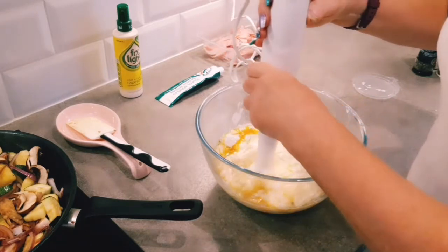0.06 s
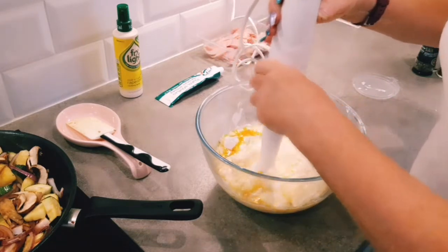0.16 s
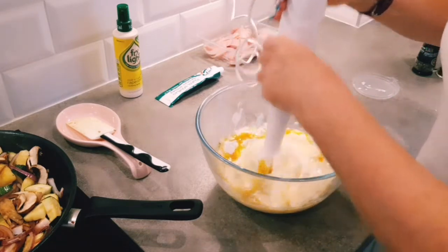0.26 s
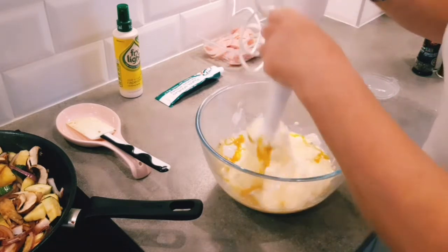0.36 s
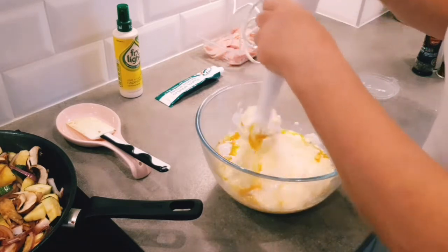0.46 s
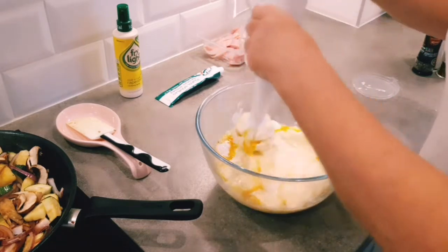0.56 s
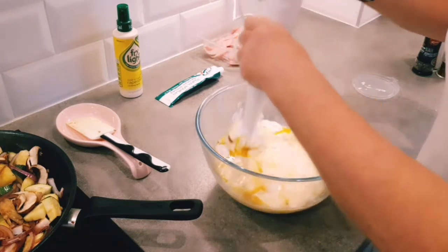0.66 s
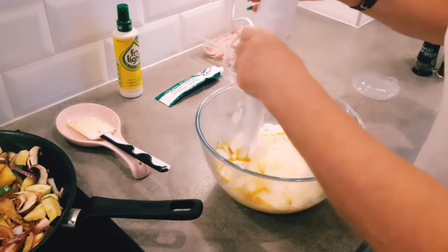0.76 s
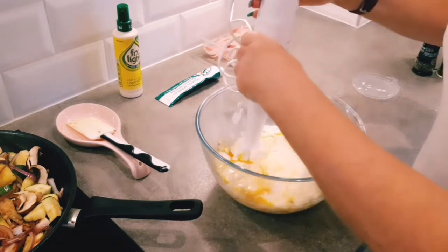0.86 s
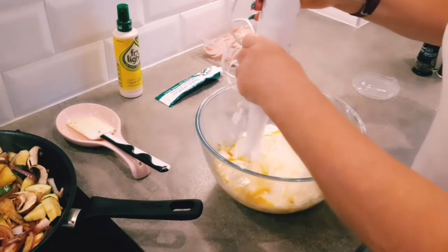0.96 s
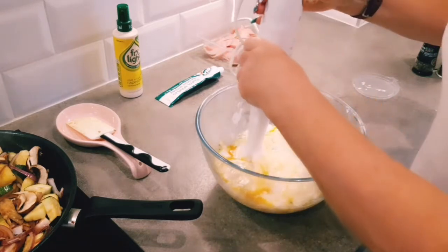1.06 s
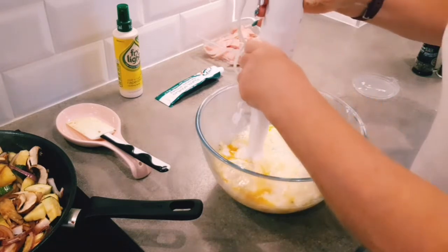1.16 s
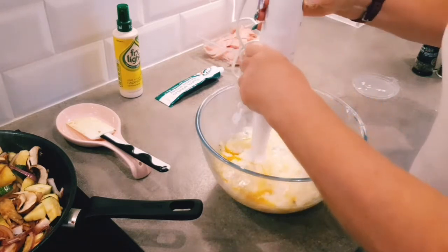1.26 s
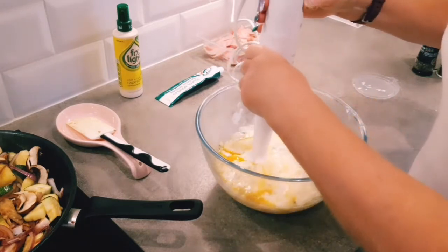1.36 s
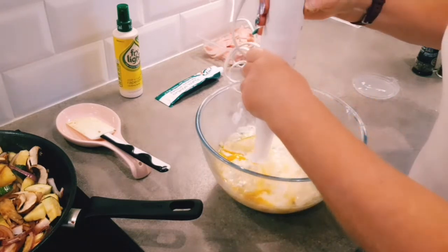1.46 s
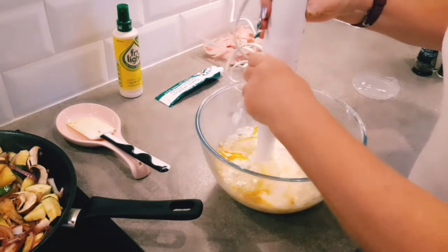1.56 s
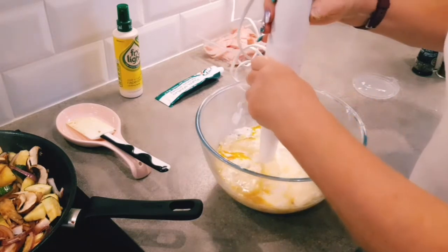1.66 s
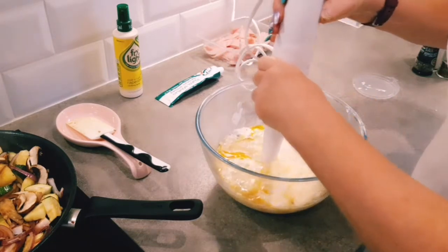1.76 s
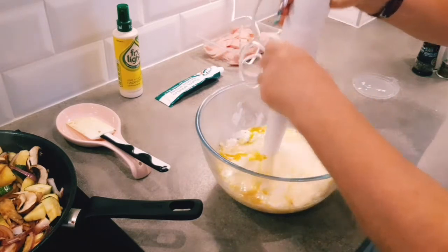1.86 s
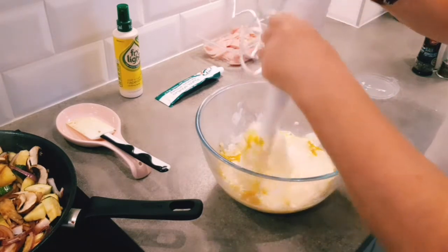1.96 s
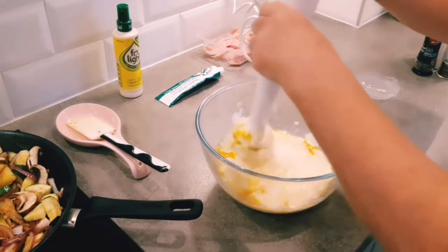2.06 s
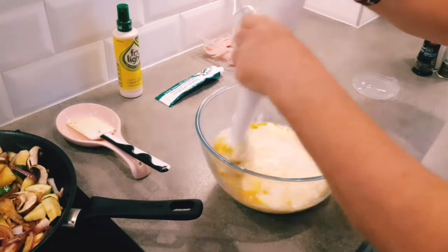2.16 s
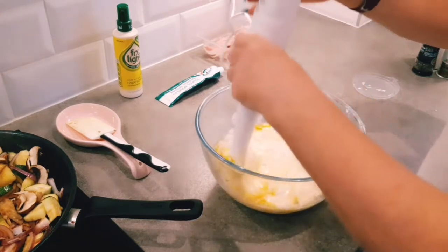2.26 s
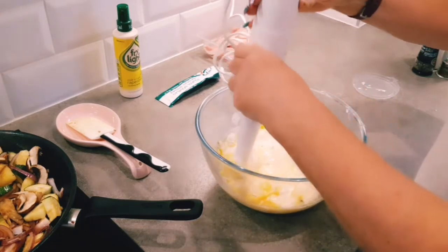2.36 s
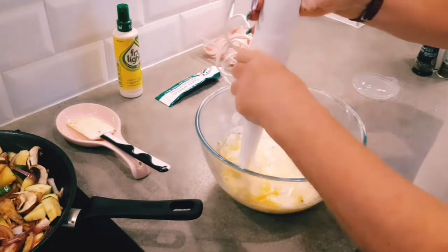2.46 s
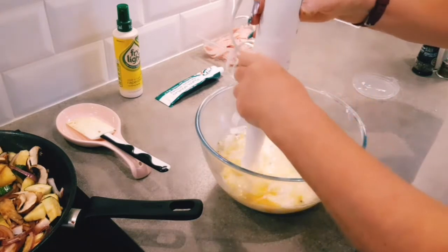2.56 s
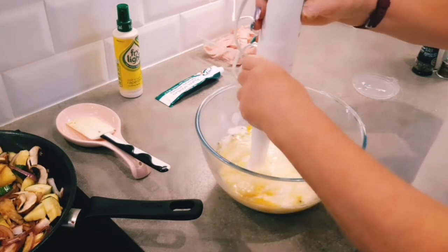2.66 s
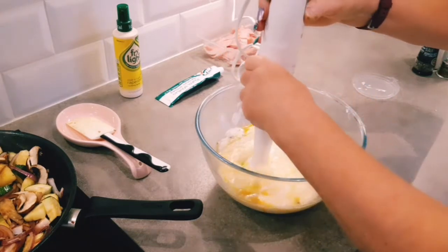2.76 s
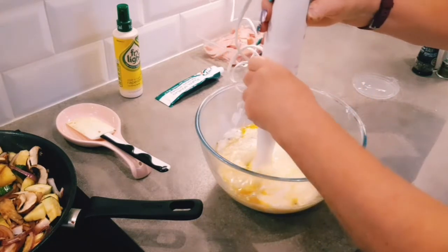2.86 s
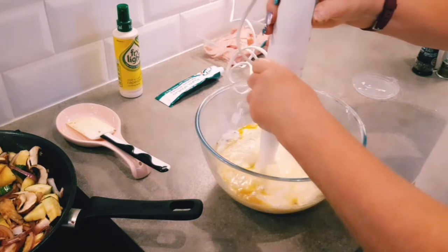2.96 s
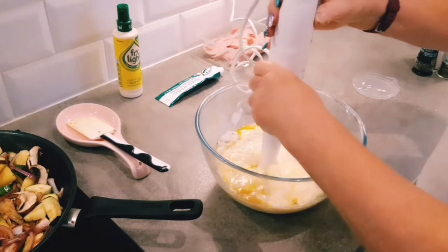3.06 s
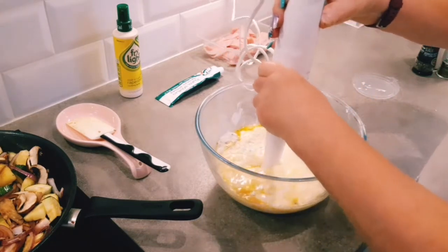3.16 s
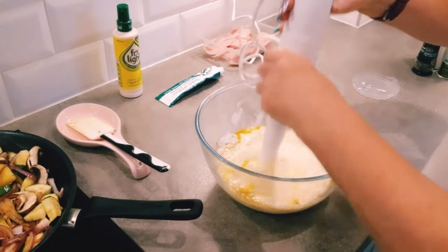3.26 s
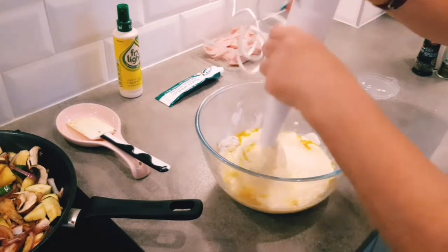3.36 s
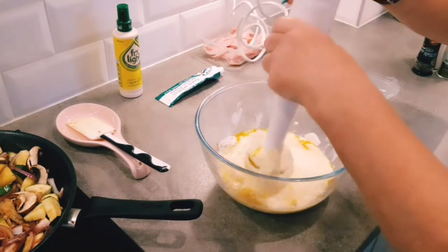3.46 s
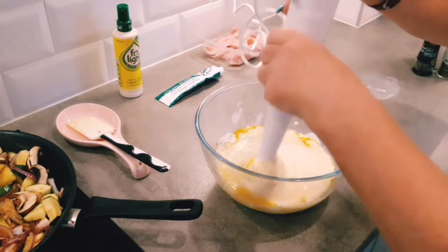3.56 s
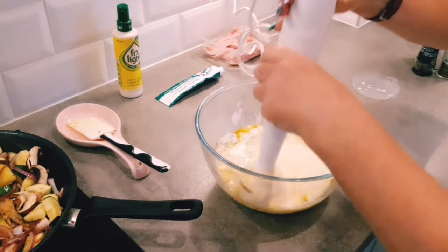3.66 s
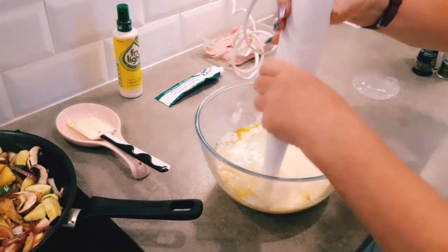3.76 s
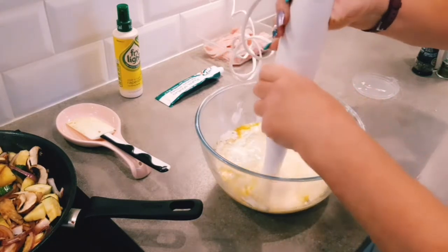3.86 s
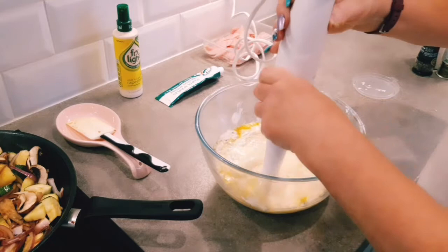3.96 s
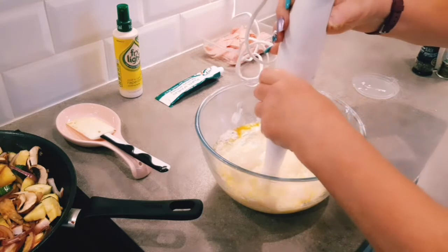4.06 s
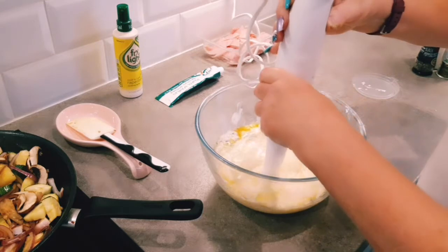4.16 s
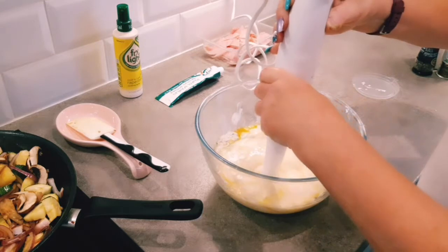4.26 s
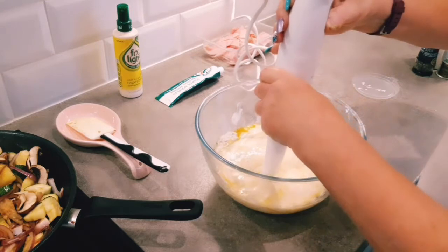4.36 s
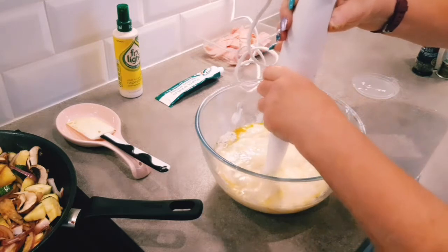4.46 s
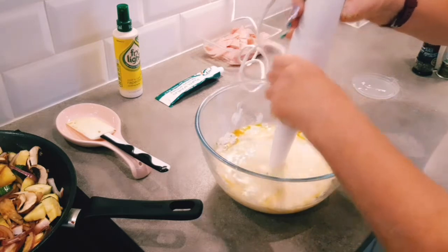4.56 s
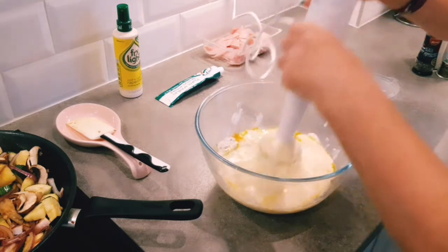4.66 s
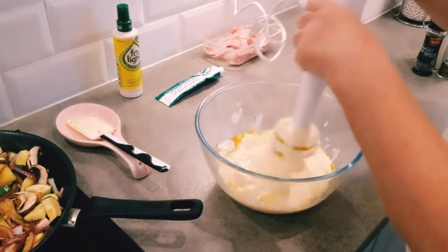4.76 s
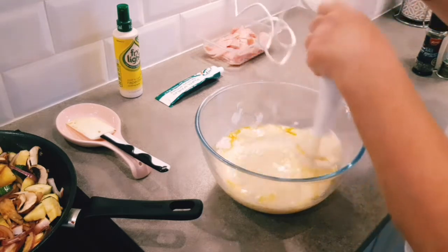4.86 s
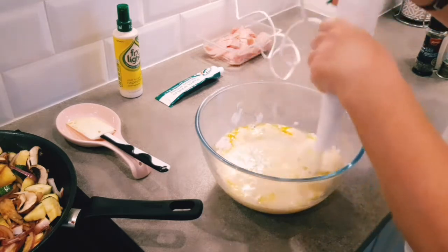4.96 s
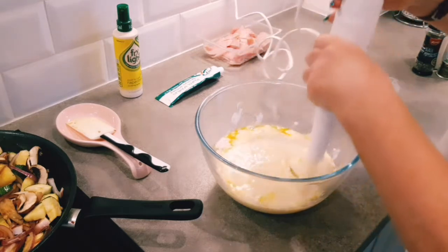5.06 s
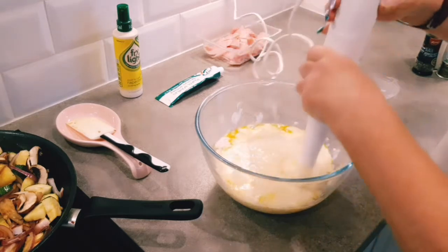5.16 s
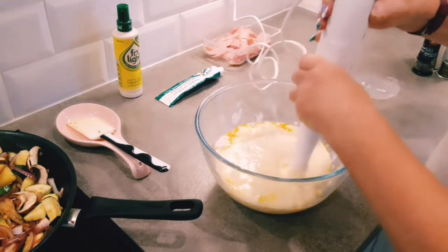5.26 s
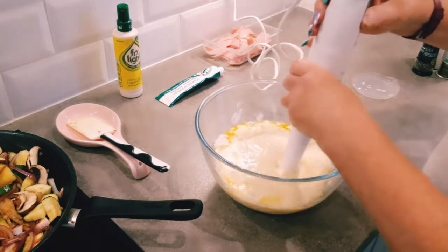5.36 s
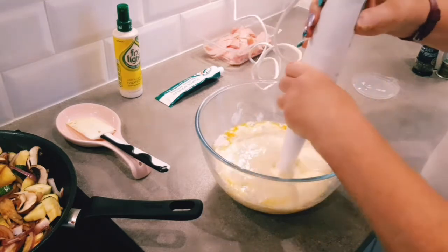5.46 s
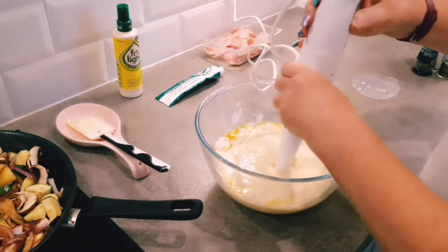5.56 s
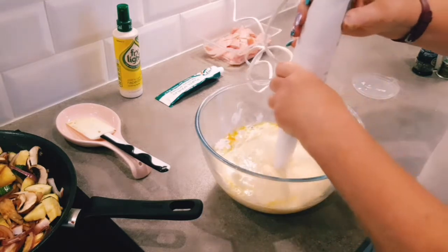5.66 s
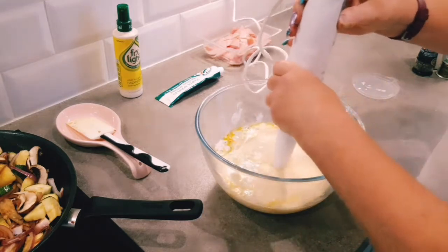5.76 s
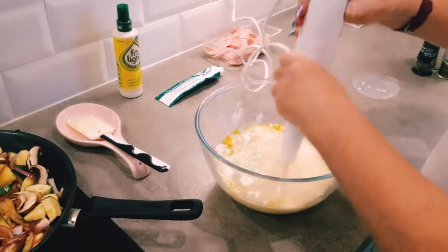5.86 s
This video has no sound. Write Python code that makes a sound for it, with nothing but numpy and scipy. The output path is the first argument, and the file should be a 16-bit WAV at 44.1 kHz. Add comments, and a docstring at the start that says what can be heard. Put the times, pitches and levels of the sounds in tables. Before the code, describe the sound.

Close up in a tiled home kitchen, a stick blender pulses five times in a glass bowl of egg and cream. The first burst is already running and soon stops; four more follow about every 1.4 seconds, each a rattling motor whirr with wet churning. Between them the foot scuffs and clinks on the glass with a dull worktop thump. A pan hisses very faintly. Stereo microphone nearby, lively short room echo.

```python
"""Stick blender in a glass bowl

A stick blender is pulsed five times in a glass bowl of egg and cream, in a tiled kitchen; a pan hisses nearby.
Filtered random impacts make the rattle of the shaft, filtered noise the churning liquid, and shaken sines the hum.
After each release the tones die first, and the noise fades as friction stops the shaft.
Between bursts the foot lands on the glass: scuffs of noise, and clicks that set decaying modes ringing."""
import sys
import numpy as np
from scipy import signal
from scipy.fft import rfft, irfft, next_fast_len
from scipy.io import wavfile

SR = 44100
rng = np.random.default_rng(int(sys.argv[2]) if len(sys.argv) > 2 else 0)


def wrap_up_sound(samples):
    """Save the sound to the file named by the first command line argument, as 16-bit audio."""
    columns = np.atleast_2d(samples).T
    # keep every value between -1 and 1, then stretch to whole-number steps
    tamed = np.clip(columns, -1, 1)
    steps = np.round(tamed * 32767).astype(np.int16)
    wavfile.write(sys.argv[1], SR, steps)


N = 260190
TIME = np.arange(N) / SR

# resonances of housing and bowl: (centre [Hz], width [Hz], lift [dB])
HOUSING_MODES = [(295, 33, -3.5), (388.7, 45, 7), (600, 30, 3), (735, 57, 4.5), (969, 56, 4),
                 (1226, 130, 3), (1780, 200, 4), (2787, 74, 5.5)]


def current_press():
    """Piecewise-constant control: the columns of the latest press of the button at every moment."""
    # presses of the button, the first begun before time zero; levels are relative:
    # (on [s], off [s], coasting time [s], free speed [turns/s], sag under load [turns/s], pick-up time [s],
    #  time until the blade runs free [s], churning level [dB], churning build-up [s],
    #  final blade tone level [dB], blade tone swell [dB/s], shaft tone level [dB],
    #  swirl level [dB], swirl length [s], push on the worktop [dB])
    presses = np.array([(-0.4, 0.154, 0.15, 308, 47, 0.13, 0.46, -23, 0.036, -31, -5, -27, -31, 0.47, -3.5),
                        (1.128, 1.713, 0.17, 335, 66.3, 0.5, 0.47, -24.5, 0.1, -24, 2.5, -26.5, -24, 0.38, 0.5),
                        (2.549, 3.157, 0.19, 321, 54.2, 0.26, 0.35, -25.5, 0.13, -20, 17.5, -24, -23, 0.12, -3),
                        (3.948, 4.456, 0.2, 306, 24.7, 0.1083, 0.43, -22.3, 0.0082, -28, 9, -28.5, -33, 0.33, -14),
                        (5.276, 5.784, 0.32, 314, 47, 0.3, 0.44, -24.5, 0.041, -20, 25, -30.5, -36, 0.55, 7)])
    latest = np.searchsorted(presses[:, 0], TIME, side="right") - 1
    return presses[np.maximum(latest, 0)].T


def blender(count=3):
    """Superposition: noise radiated independently by several parts (housing, shaft, bowl), and a shared hum."""
    (on, off, _, free_speed, sag, pickup_s, free_s, churn_db, build_s,
     blade_db, swell, shaft_db, swirl_db, swirl_s, push_db) = current_press()
    grinding, brushing, driven = motor()
    age = TIME - on
    # the shaft gathers speed as the mixture gives way
    turns = free_speed - sag * np.exp(-age / pickup_s)
    angle = 2 * np.pi * np.cumsum(turns) / SR
    freeing_s = 0.0062
    free = step(age - free_s, freeing_s)

    # the rattle starts just after the motor, builds up quickly and eases by 1 dB once the blade runs free
    rattle_gain = from_db(-20 - 1 * free) * rise(age - 0.0047, 0.026) * grinding
    # the liquid starts later still; the power below 1 keeps it moving a little longer than the rattle
    churn_gain = from_db(churn_db) * rise(age - 0.023, build_s) * grinding ** 0.56
    brush_gain = from_db(-43.5) * brushing
    parts = []
    for _ in range(count):
        part = rattle_gain * rattle(angle) + churn_gain * churn() + brush_gain * brushes(angle)
        parts.append(part / np.sqrt(count))

    # thick mixture damps the shaft; it shakes briefly when the blade runs free
    shake_s, damping_db = 0.22, 14
    shaking = free * step(free_s + shake_s - age, freeing_s)
    shaft_gain = from_db(shaft_db - 3 - damping_db * (1 - shaking)) * rise(age, build_s)
    # the blade tone emerges once the mixture is moving, then its level slopes until release
    blade_gain = from_db(blade_db - 3.5 - swell * np.maximum(off - TIME, 0)) * step(age - 0.13, 0.023)
    # unbalance sounds once a turn, the two wings twice
    hum = shaft_gain * tone(angle, wobble=0.095, rough_db=2.5)
    hum += blade_gain * tone(2 * angle, wobble=0.25, rough_db=2.5)
    hum += swirl(age, turns, swirl_db, swirl_s) + worktop_hum(age, push_db)
    return parts, driven * hum


def motor(fade_power=4.53, brush_power=1.0, spin_up_s=0.015, unload_s=0.053, start_s=0.0044):
    """Friction and inertia: gains of grinding and brushes follow the coasting shaft, tones die on release."""
    on, off, coast_s = current_press()[:3]
    begun = rise(TIME - on, start_s)
    # relative speed for the levels only; the pitch does not follow it
    speed = np.clip(1 - (TIME - off) / coast_s, 0, 1)
    grinding = begun * speed ** fade_power
    brushing = rise(TIME - on, spin_up_s) * speed ** brush_power
    driven = begun * np.exp(-np.maximum(TIME - off, 0) / unload_s)
    return grinding, brushing, driven


def rattle(angle, impacts_per_s=3000, size_db=2.5, throb=0.38, hiss_db=-4, flutter_db=1.87):
    """Impact excitation: shaft, coupling and blade chatter in tiny impacts, bunched on each turn."""
    # broad colour of the rattle: (frequency [Hz], level [dB])
    rattle_colour = [(30, -48), (250, -22), (500, -7.5), (700, -4), (1250, 2), (1450, 0), (2100, -2.5),
                     (2600, -10.5), (3100, -13), (4300, -16), (6000, -24), (9500, -35.5), (14500, -34),
                     (16000, -38)]
    # the coupling clacks as it takes up its slack: (time [s], size against the running force [dB])
    clacks = [(1.143, 22), (2.567, 16), (3.982, 24), (5.294, 17)]
    sizes = from_db(size_db * np.minimum(rng.exponential(1, N), 5))
    signed_sizes = sizes * rng.choice([-1, 1], N)
    impacts = rms_one(signed_sizes * (rng.random(N) < impacts_per_s / SR))
    hiss = from_db(hiss_db) * rng.standard_normal(N)
    force = (impacts + hiss) * (1 + throb * np.cos(angle))
    force = rms_one(force * from_db(flutter_db * drift(70)))
    for s, db in clacks:
        force[int(s * SR)] += from_db(db)
    return rms_one(colour(force, rattle_colour, HOUSING_MODES))


def churn(slosh_db=-1.0):
    """Turbulence: liquid thrown about by the blade is unsteady noise, coloured by housing and bowl."""
    # colour of the churning liquid: (frequency [Hz], level [dB])
    churn_colour = [(20, -33), (55, -25), (80, -7), (100, -5.5), (160, 3), (195, -8.5), (270, 0),
                    (380, -1.5), (450, -5), (540, 4), (750, -3), (1200, -2.5), (1700, -18.5), (16000, -65)]
    turbulence = rng.standard_normal(N) * from_db(slosh_db * drift(40))
    return rms_one(colour(turbulence, churn_colour, HOUSING_MODES))


def brushes(angle, throb=0.3, sparks_db=1.0):
    """Sliding friction: carbon brushes on the commutator give a thin hiss, pulsing twice a turn."""
    hiss = rng.standard_normal(N) * (1 + throb * np.cos(2 * angle))
    hiss = hiss * from_db(sparks_db * drift(200))
    band = signal.butter(2, [8000, 15000], "band", fs=SR, output="sos")
    return rms_one(signal.sosfilt(band, hiss))


def swirl(age, turns, level_db, length_s):
    """Rotating flow: the mixture drones early in each burst, circling at just under half the shaft speed."""
    share, lag, pickup_s = 0.487, 0.0694, 0.1403  # slower at first by the lag
    swirl_hz = share * turns * (1 - lag * np.exp(-age / pickup_s))
    gain = from_db(level_db - 2) * rise(age, 0.034) ** 2 * step(length_s - age, 0.039)
    return gain * tone(2 * np.pi * np.cumsum(swirl_hz) / SR, wobble=0.3, rough_db=2.0)


def worktop_hum(age, push_db, mains_hz=100, hum_db=-39, rumble_db=-44):
    """Structure-borne sound: pressing the foot down passes mains hum and rumble into the worktop."""
    # colour of the rumble: (frequency [Hz], level [dB])
    rumble_colour = [(15, -18), (35, -20), (60, -9), (85, -6), (110, -1.5), (170, 3), (300, -31),
                     (2000, -58)]
    # the hand bears down gradually
    mains = rise(age, 0.17) * tone(2 * np.pi * mains_hz * TIME, wobble=0.18, rough_db=2.0)
    rumble = rms_one(colour(rng.standard_normal(N), rumble_colour))
    return from_db(push_db) * (from_db(hum_db) * mains + from_db(rumble_db) * rumble)


def tone(angle, wobble, rough_db):
    """Phase and amplitude modulation: a sine shaken by an uneven load."""
    sine = np.sqrt(2) * np.sin(angle + wobble * drift(60))
    return sine * from_db(rough_db * drift(45))


def knocks(tick_db=-13, contact_s=0.0045, settle_s=0.0012, soft_hz=900):
    """Modal excitation: the foot scuffs the glass, which rings; then its weight thumps the worktop."""
    # landings of the foot, levels relative: (time [s], tick level [dB], brightness [dB/octave],
    #  glass ring level [dB], other glass modes against the ring [dB], thump level [dB], thump delay [s])
    landings = [(0.6753, -3.5, -5.5, -1, -6, -5.5, 0.0026), (2.1926, 0, -3, 1, -1, -1.5, 0.0032),
                (3.6619, -11, -5.5, -20, -8, -6.5, 0.0051), (3.897, -27, -11, -40, 0, -26, 0.0027),
                (4.9376, -8.5, -3.3, -28, -4, -6.5, 0.00935), (5.1753, -21, -1, -49, -3, -50, 0.004)]
    # colour of the contact: (frequency [Hz], level [dB])
    tick_colour = [(100, -39), (600, -6), (1000, -5.5), (1450, -1.5), (1830, 7), (2300, -4), (3500, 0.5),
                   (6000, -8.5), (10000, -17), (16000, -9)]
    # modes of the filled bowl, the close main pair first: (frequency [Hz], level [dB], t60 [s])
    glass_modes = [(1760, -48, 0.8), (1780, -43.5, 0.4), (970, -44, 0.56), (2720, -38, 0.25),
                   (3700, -46, 0.3)]
    # modes of the worktop under the bowl: (frequency [Hz], level [dB], t60 [s])
    worktop_modes = [(103, -25.5, 0.3), (129.1, -23, 0.29), (159.3, -27.5, 0.33), (212.6, -27.5, 0.15),
                     (258, -30.5, 0.14), (326.5, -31, 0.2), (390.6, -33.5, 0.47), (484, -39, 0.2)]
    ticks, main_taps, other_taps, pushes = np.zeros((4, N))
    t = TIME[:SR // 10]
    for s, db, bright, ring_db, others_db, push_db, delay_s in landings:
        at = int(s * SR)
        envelope = np.exp(-t / contact_s) * (1 - np.exp(-t / settle_s))
        scuff = rng.standard_normal(len(t)) * envelope
        tilted = [(hz, level + bright * np.log2(hz / 2000)) for hz, level in tick_colour]
        ticks[at:at + len(t)] += from_db(db + tick_db) * colour(scuff, tilted)
        # where the foot lands decides how strongly the other modes join in
        main_taps[at] = from_db(ring_db)
        other_taps[at] = from_db(ring_db + others_db)
        pushes[int((s + delay_s) * SR)] = from_db(push_db)
    # a soft push holds little treble
    pushes = signal.sosfilt(signal.butter(1, soft_hz, fs=SR, output="sos"), pushes)
    glass = ring(main_taps, glass_modes[:2]) + ring(other_taps, glass_modes[2:])
    return ticks, glass + ring(pushes, worktop_modes)


def ring(clicks, modes):
    """Damped resonance: clicks set decaying sines ringing, neighbours in opposite sense."""
    out = 0
    for k, (hz, db, t60) in enumerate(modes):
        r = from_db(-60 / (t60 * SR))  # decay per sample
        w = 2 * np.pi * hz / SR
        poles = [1, -2 * r * np.cos(w), r * r]
        mode = signal.lfilter([0, np.sin(w)], poles, clicks + 1e-18)
        out = out + (-1) ** k * from_db(db) * mode
    return out


def kitchen(x, first_echo_s=0.003, early_db=4, early_s=0.018):
    """Reverberation: dense echoes, strong at first from worktop and tiles, each band dying at its own pace."""
    # ring time of the kitchen: (frequency [Hz], t60 [s])
    ring_times = [(100, 0.8), (400, 0.65), (1000, 0.64), (2500, 0.49), (6000, 0.76), (14000, 0.4)]
    t, hz = TIME[:SR], np.arange(SR // 2 + 1)
    noise = rfft(diffuse(rng.standard_normal((2, SR))))
    tail = 0
    for k, (_, t60) in enumerate(ring_times):
        # overlapping bands whose shares add up to 1
        share = at_hz([(row[0], j == k) for j, row in enumerate(ring_times)], hz)
        tail = tail + irfft(noise * share, SR) * from_db(-60 * t / t60)
    tail = tail * (t > first_echo_s) * from_db(early_db * np.exp(-t / early_s))
    tail /= np.sqrt(np.sum(tail ** 2) / 2)  # unit energy per port on average
    return signal.fftconvolve(tail, x[None], axes=1)[:, :N]


def background(level_db=-49.5, waver_db=0.5):
    """Diffuse field: a pan simmers with a fine hiss over the low murmur of the kitchen."""
    # pan and kitchen background: (frequency [Hz], level [dB])
    background_colour = [(20, -18), (55, -6), (100, -0.5), (160, 0), (220, -7), (330, 1.5), (400, -8),
                         (480, -7), (1300, -10), (2600, -14), (4500, -13), (6500, -24), (10000, -24.5),
                         (16000, -22.5)]
    pair = np.array([colour(white, background_colour) for white in rng.standard_normal((2, N))])
    hiss = rms_one(diffuse(pair, alike_hz=800, most_alike=0.92))
    return from_db(level_db + waver_db * drift(18)) * hiss


def diffuse(pair, alike_hz=900, most_alike=0.94):
    """Spatial coherence: long waves reach both ports alike, short ones differ."""
    size = next_fast_len(pair.shape[1])
    hz = np.arange(size // 2 + 1) * SR / size
    alike = most_alike / (1 + (hz / alike_hz) ** 2)
    mid, side = rfft(pair, size)
    spectra = np.sqrt(1 + alike) * mid + np.sqrt(1 - alike) * side * [[1], [-1]]
    return irfft(spectra, size)[:, :pair.shape[1]] / np.sqrt(2)


def colour(x, points, peaks=(), size=8192):
    """Minimum-phase filtering: a causal filter with a broad spectrum and resonant lifts."""
    hz = np.arange(size // 2 + 1) * SR / size
    db = at_hz(points, hz)
    for centre, width, lift in peaks:
        db = db + lift / (1 + (2 * (hz - centre) / width) ** 2)
    # folding the cepstrum onto positive times makes the response causal
    cepstrum = irfft(np.log(from_db(db)))[:size // 2]
    cepstrum[1:] *= 2
    response = irfft(np.exp(rfft(cepstrum, size)))
    return signal.fftconvolve(x, response)[:len(x)]


def at_hz(points, hz):
    """Logarithmic pitch scale: read a table on a log-frequency axis."""
    points = np.array(points)
    return np.interp(np.log(np.maximum(hz, 1)), np.log(points[:, 0]), points[:, 1])


def drift(rate):
    """Slow random modulation: chance values, rate per second, joined by lines and scaled to unit rms."""
    knots = rng.standard_normal(int(N / SR * rate) + 2)
    return rms_one(np.interp(TIME * rate, np.arange(len(knots)), knots))


def step(s, width_s):
    """Sigmoid transition: smooth rise from 0 to 1 around s = 0."""
    return 0.5 + 0.5 * np.tanh(s / (2 * width_s))


def rise(age, time_s):
    """First-order relaxation: approach 1 from 0 with a time constant, starting at age 0."""
    return 1 - np.exp(-np.maximum(age, 0) / time_s)


def from_db(db):
    """Logarithmic level: decibels to amplitude gain."""
    return 10 ** (np.asarray(db) / 20)


def rms_one(x):
    """Effective value: scale to unit rms."""
    return x / np.sqrt(np.mean(x ** 2) + 1e-20)


def scene(direct_db=-5.0, noise_room_db=-2.5, hum_room_db=-17, tick_room_db=-3, ring_room_db=-8):
    """Direct and reverberant field: a bowl nearer the right port, each noisy part with its own echoes."""
    parts, hum = blender()
    ticks, ringing = knocks()
    direct = from_db(direct_db) * sum(parts) + hum + ticks + ringing
    late = np.concatenate([np.zeros(4), direct[:-4]])  # the left port hears it 4 samples later
    room = from_db(noise_room_db) * sum(kitchen(part) for part in parts)
    shared = from_db(hum_room_db) * hum + from_db(tick_room_db) * ticks + from_db(ring_room_db) * ringing
    room += kitchen(shared)
    return np.array([late, direct]) + room + background()


def record(dry):
    """Transducer response: each microphone port has its own colour, and the top is cut."""
    # colour of the two ports: (frequency [Hz], left level [dB], right level [dB])
    ports = np.array([(97, -4, -8), (280, 2, 2), (600, 4.5, 1), (870, 4.5, -0.5), (1360, 2, -3),
                      (2200, 6.5, -3.5), (2850, 5.5, -1.5), (3980, 7.5, -5.5), (4900, 8, -2), (5840, 4, 1),
                      (7800, -3, 5), (8270, -17, 1.5), (10400, -8.5, -2.5), (11900, -1.5, -1.5)])
    heard = np.array([colour(dry[k], ports[:, [0, k + 1]]) for k in range(2)])
    cutoff_hz = 15800
    return signal.sosfilt(signal.ellip(12, 0.1, 90, cutoff_hz, fs=SR, output="sos"), heard)


dry = scene()
out = record(dry)
wrap_up_sound(out)
```